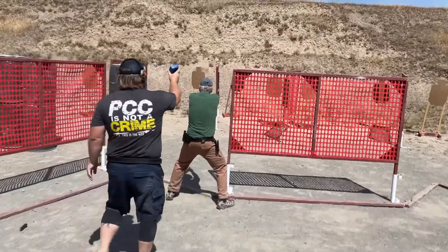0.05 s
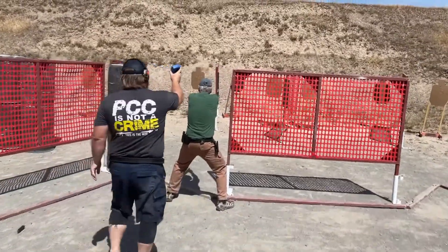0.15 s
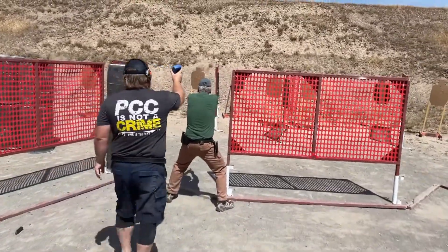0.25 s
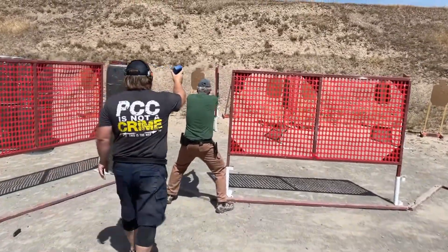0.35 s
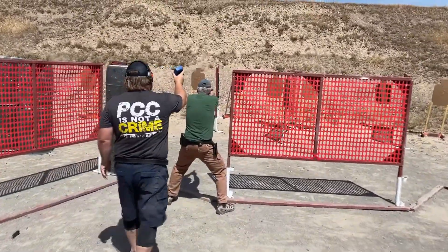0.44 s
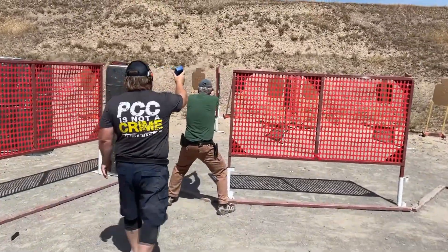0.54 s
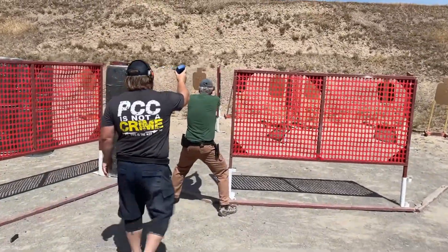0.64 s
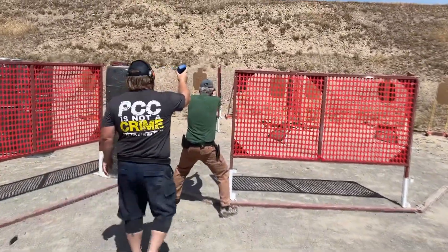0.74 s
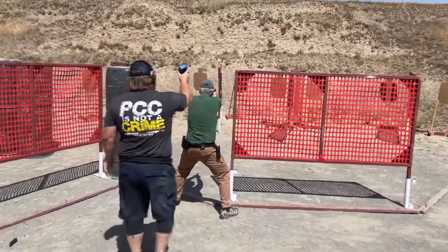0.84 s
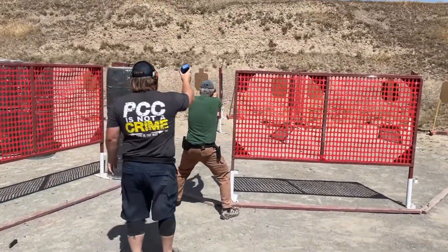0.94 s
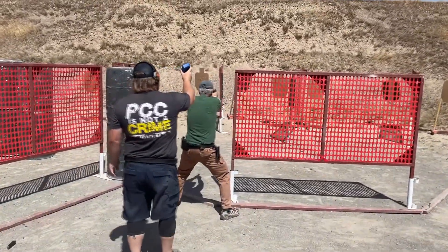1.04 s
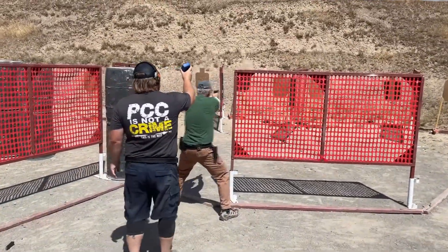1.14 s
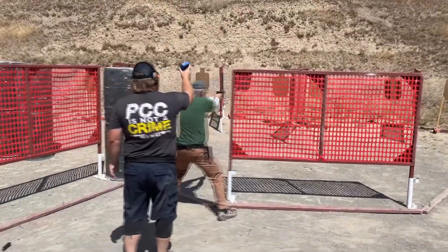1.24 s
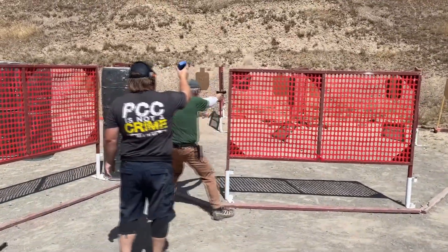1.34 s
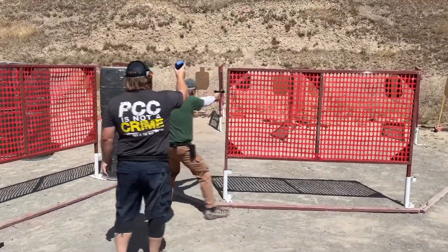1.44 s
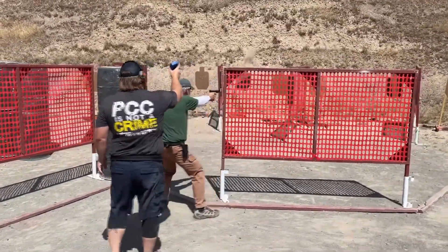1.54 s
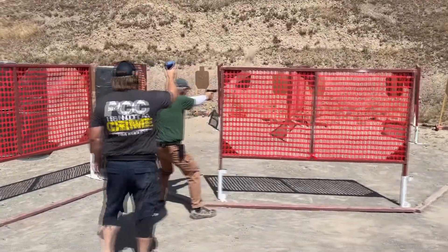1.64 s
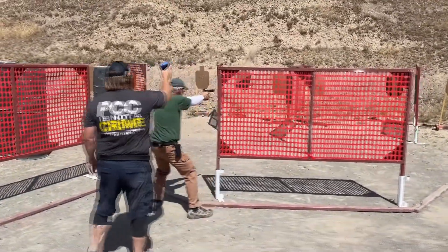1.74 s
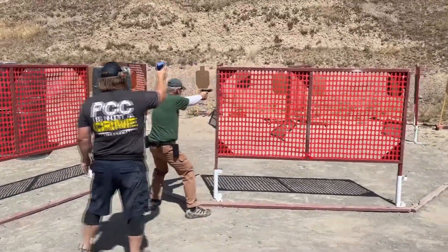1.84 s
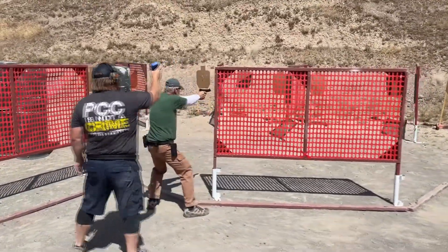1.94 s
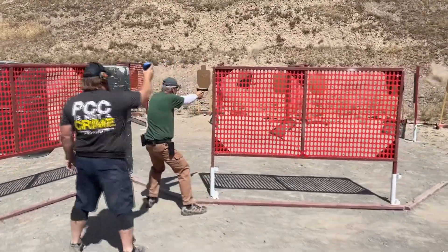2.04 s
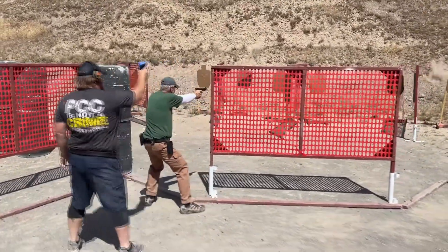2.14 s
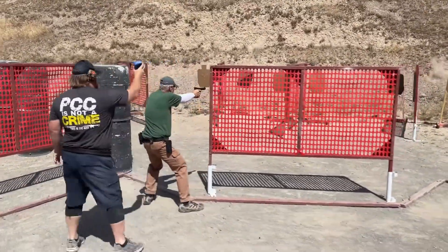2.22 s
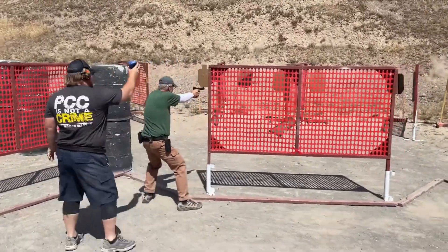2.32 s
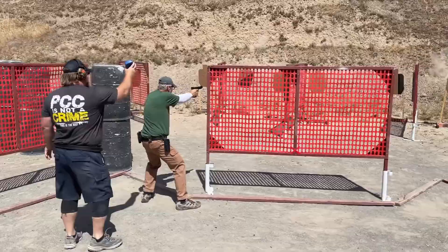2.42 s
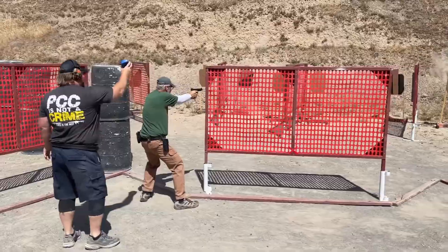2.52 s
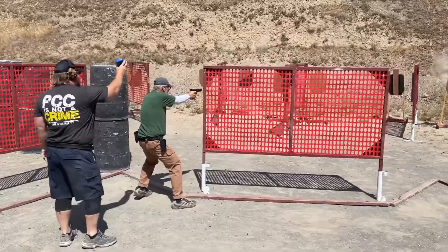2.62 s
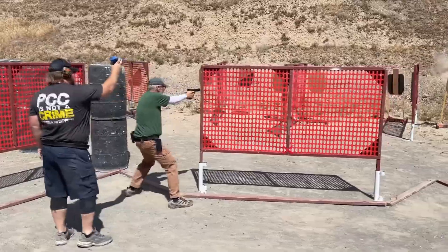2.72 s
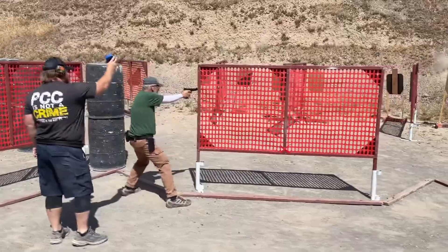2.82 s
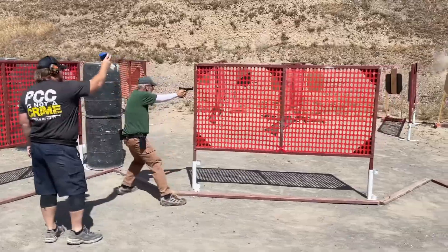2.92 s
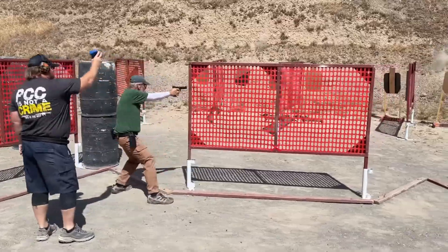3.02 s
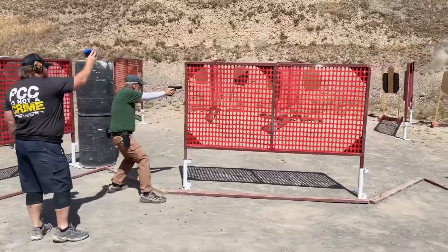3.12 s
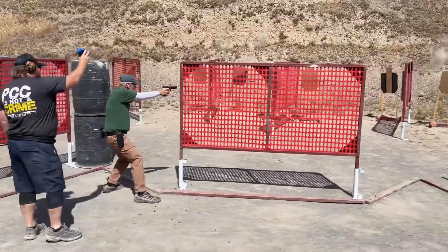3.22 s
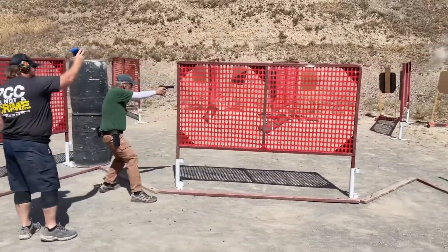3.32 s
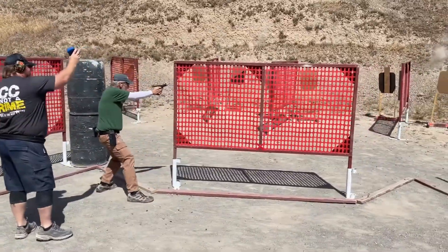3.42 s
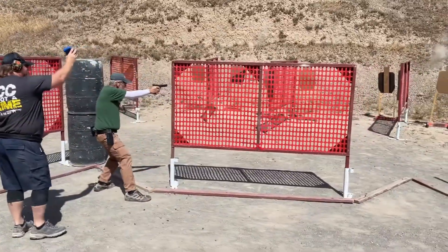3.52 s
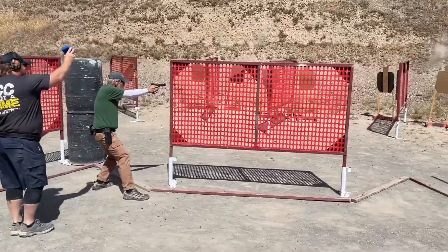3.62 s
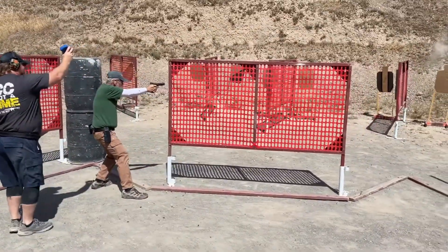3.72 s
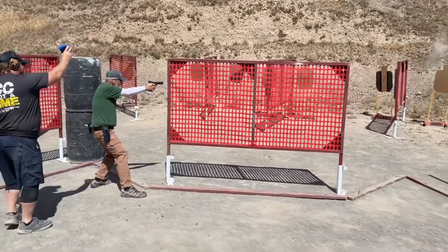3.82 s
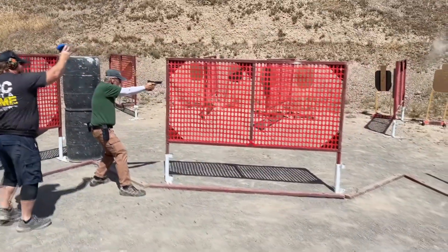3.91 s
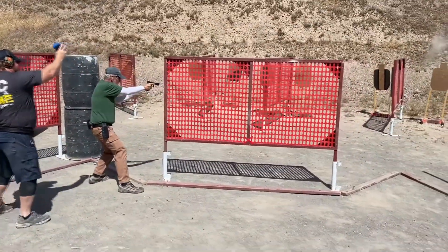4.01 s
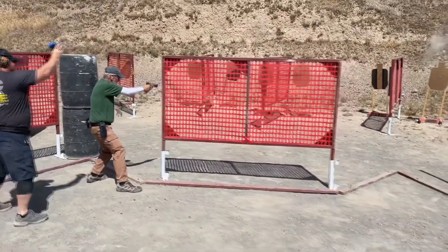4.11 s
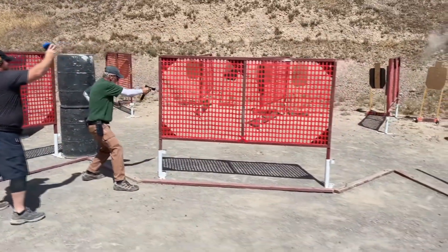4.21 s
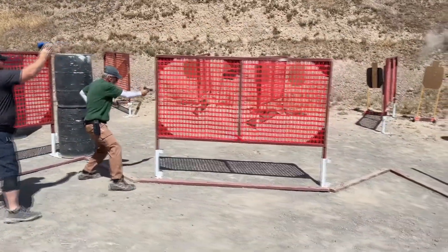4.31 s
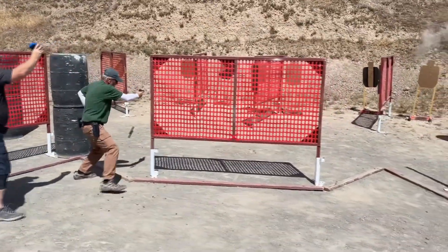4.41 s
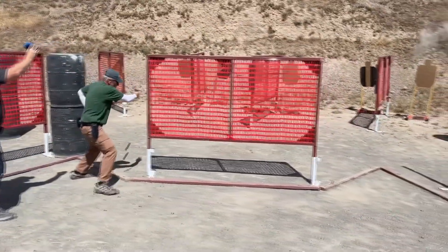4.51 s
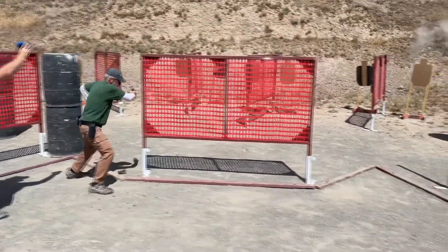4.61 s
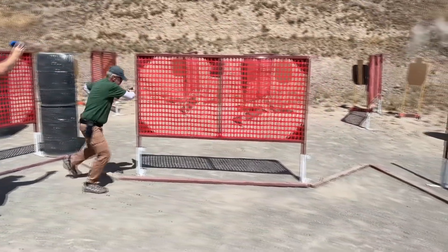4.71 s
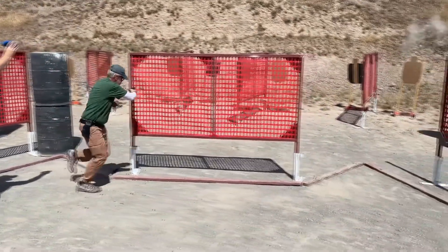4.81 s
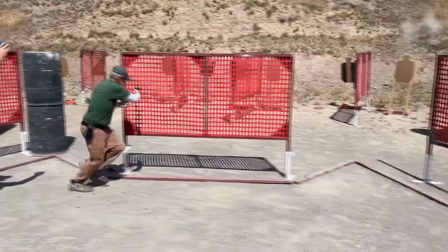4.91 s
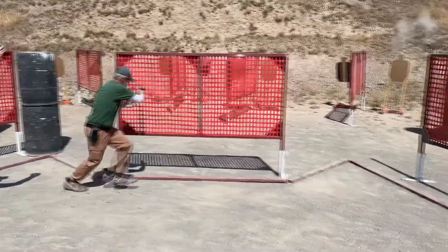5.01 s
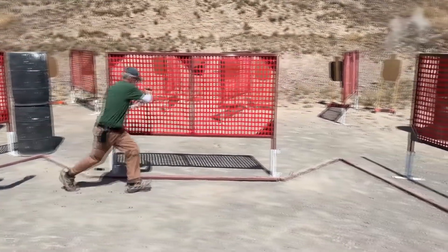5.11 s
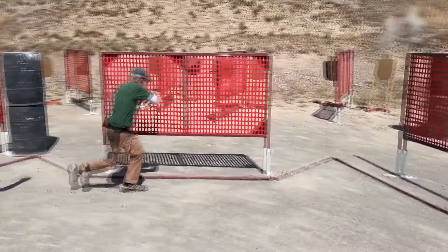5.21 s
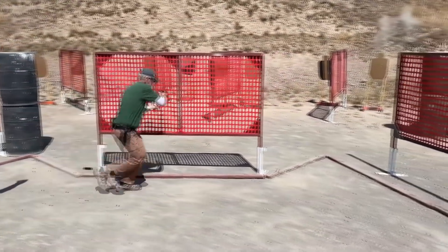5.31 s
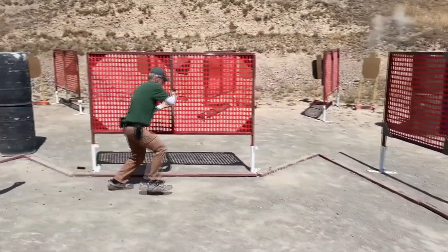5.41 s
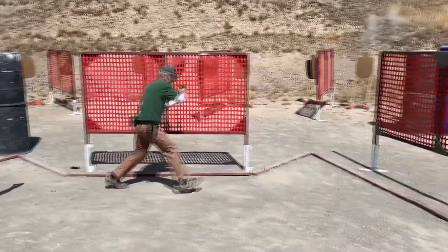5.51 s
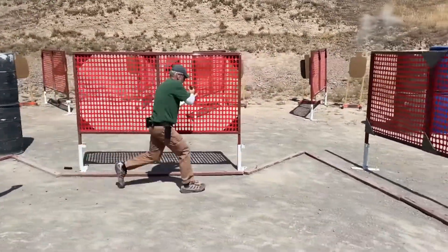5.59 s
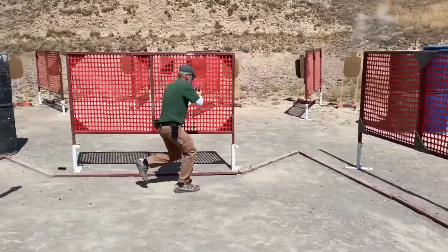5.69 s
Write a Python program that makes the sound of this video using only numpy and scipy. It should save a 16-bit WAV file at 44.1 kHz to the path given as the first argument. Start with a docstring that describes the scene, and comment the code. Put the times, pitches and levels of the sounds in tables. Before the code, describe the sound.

Outdoors in a gravel shooting bay, a nearby pistol fires hard, dry cracks in quick pairs, each with slapping echoes off barricades and dirt slopes and a short rolling tail. Duller pops from another pistol slip in early. After the last pair, shoes scuff quickly over gravel and the far pops return. Low wind rumbles on the stereo microphone a few metres behind.

```python
"""A pistol fires in quick pairs, a few metres ahead, in a gravel shooting bay walled by earth berms.
Each shot is a filtered pressure pulse and damped thumps, with its ground bounce; then come noise for the
bullet's slap, thin delayed copies off barricades, sprays of small echoes off the berms and a long hill roll.
Pops with bright echoes, from another pistol in the next bay, begin between the first pairs and return at the end.
A dull knock, then shoes scuffing gravel, are decaying noise; wind rumbles and flutters as lumpy noise throughout."""
import sys
import numpy as np
from scipy import signal
from scipy.fft import rfft, irfft
from scipy.io import wavfile
from scipy.ndimage import uniform_filter1d, minimum_filter1d

SR = 44100
rng = np.random.default_rng(int(sys.argv[2]) if len(sys.argv) > 2 else 0)


def inscribe(sig):
    """Save sig as 16-bit PCM at rate SR to the path in sys.argv[1].

    A 1-D sig is mono; a 2-D sig holds one channel per row.
    Samples are clipped to [-1, 1] before scaling.
    """
    pcm = np.round(np.clip(np.atleast_2d(sig).T, -1, 1) * 32767)
    wavfile.write(sys.argv[1], SR, pcm.astype(np.int16))


N = 253575
# time axis of a single event, in seconds
T = np.arange(2 ** 16) / SR

# Spectrum of an echo off rough earth. Each row: frequency in Hz, relative level in dB.
BERM_SPECTRUM = [(50, -9.5), (200, -8.5), (450, 1), (750, 2.5), (1200, -10.5), (2400, -2.5), (4000, -14),
                 (5500, -12.5), (7500, -22), (10000, -23.5), (16000, -44)]
# Spectrum of grinding stones. Each row: frequency in Hz, relative level in dB.
GRAVEL_SPECTRUM = [(150, 8), (500, 2.5), (1500, 4.5), (3000, 1), (6000, -0.5), (10000, -3), (16000, -12)]


def near_pistol():
    """Impulse and reflections: direct blast and ground image, then early echoes, then diffuse returns."""
    # Shots in the bay. Each row: start in seconds, blast level in dB, gain of the bark band in dB,
    # ground bounce delay in ms, side screen echo in dB relative to the blast, thump level in dB,
    # bullet flight time in ms, bullet slap level in dB.
    shots = [(-0.1155, 1, -1.5, 2, -10, -15, 17, -24), (0.1973, -0.5, -4.5, 2.62, -2.5, -8.5, 22, -25.5),
             (0.6721, 6, -4, 2.7, -7.5, -23, 17.2, -10.5), (0.9872, 1, -5.5, 2.7, -8, -27.5, 22, -17.5),
             (1.9019, 1, 4.5, 2.42, -27, -22, 13.3, -22), (2.4239, 4.5, 3, 2.6, -25, -14, 19, -19.5),
             (3.4408, -1.5, 1.5, 2.5, -17.5, -10, 10.8, -21),
             (3.8043, 6.5, 0, 2.5, -21, -16.5, 13.6, -22.5)]
    # Spectra. Each row: frequency in Hz, relative level in dB.
    blast_spectrum = [(40, -22.5), (150, -5.5), (260, 5.5), (400, 3), (600, -0.5), (900, -1), (1250, -3),
                      (1900, -4), (2800, -13.5), (4000, -24), (9000, -23.5), (16000, -42.5)]
    face_spectrum = [(60, -21.5), (300, -10.5), (750, 5), (1200, -3), (2200, 1), (3200, -0.5), (4500, -16),
                     (16000, -33)]
    slap_spectrum = [(200, -17.5), (1000, -7), (2500, -2), (5000, -6.5), (9000, -9), (16000, -22.5)]
    clutter_spectrum = [(60, -1.5), (200, 2.5), (400, 0), (900, 5.5), (2000, -1), (3600, -8.5), (5000, -2),
                        (7500, -18.5), (10000, -13.5), (13000, -28), (16000, -28.5)]
    roll_spectrum = [(60, -2), (250, -3.5), (550, 0), (1000, -4), (1700, -4), (3000, -8.5), (4000, -16.5),
                     (5500, -13.5), (9000, -26.5), (16000, -49)]
    hill_spectrum = [(200, -21), (900, -10), (1500, 0), (2200, -6), (3500, -12), (16000, -48.5)]

    out = np.zeros((2, N))
    muzzle = pulse(blast_spectrum)
    face_copy = pulse(face_spectrum)
    # the bark: a band of the blast that is stronger or weaker with the direction of the muzzle
    bark = signal.lfilter(*signal.iirpeak(1850, 3.4, fs=SR), muzzle)
    screen_ms = 5.0
    mean_screen_db = np.mean(shots, axis=0)[4]

    for start, blast_db, bark_db, bounce_ms, screen_db, thump_db, flight_ms, slap_db in shots:
        blast = muzzle + (from_db(bark_db) - 1) * bark
        # the hard ground returns the blast almost undiminished; a screen beside the shooter adds a third beat
        direct = arrive(blast, 0, right_lag_ms=0.0037)
        direct += from_db(-1.16) * arrive(blast, bounce_ms, right_lag_ms=0.0049)
        direct += from_db(screen_db) * arrive(blast, screen_ms, right_lag_ms=0.052)

        # the crack sizzles on for a moment, and longer when the screen's mesh scatters it back
        sizzle = from_db(-20.5) * swell(0, rise=0.001, t60=0.065)
        sizzle += from_db(screen_db - 10.5) * swell(screen_ms / 1000, rise=0.0015, t60=0.026)
        crack = arrive(noise(slap_spectrum)[0] * sizzle, 0, right_lag_ms=0.018)

        thump = muzzle_thump(thump_db)
        slap = noise(slap_spectrum) * swell(flight_ms / 1000, rise=0.00048, t60=0.016)
        clutter = reflections(clutter_spectrum, swell(0, rise=0.0032, t60=0.18), per_s=1800,
                              spread_db=3.5, ear_lag_ms=0.07)

        # rough earth slopes return a spray of small echoes, flat faces a thinner copy of the blast
        slopes = swell(0.028, rise=0.006, t60=0.145)
        slopes += from_db(-12) * swell(0.0836, rise=0.0047, t60=0.051)
        berms = reflections(BERM_SPECTRUM, slopes, per_s=2200, spread_db=3.0)
        faces = flat_face_echoes(face_copy)

        # the hill rolls on for most of a second, with a nasal return from a far slope
        roll = reflections(roll_spectrum, swell(0.033, rise=0.055, t60=0.91), per_s=6700, spread_db=4.0)
        far_slope = from_db(-0.5) * swell(0.162, rise=0.0028, t60=0.076)
        far_slope += from_db(-7) * swell(0.24, rise=0.022, t60=0.27)
        roll += reflections(hill_spectrum, far_slope, per_s=740, spread_db=2.0)
        # the far ridge answers last
        crests = swell(0.38, rise=0.06, t60=0.25) + from_db(-1) * swell(0.51, rise=0.03, t60=0.9)
        ridge = reflections(roll_spectrum, crests, per_s=900, spread_db=3.5)

        # clutter and berms gain 0.11 dB for each dB that the screen echo stands above its mean
        spill_db = 0.11 * (screen_db - mean_screen_db)
        spray = from_db(blast_db) * crack
        spray += from_db(-17 + spill_db) * clutter + from_db(-23 + spill_db) * berms
        spray += from_db(-52) * roll + from_db(-64.5) * ridge

        shot = from_db(blast_db) * direct + thump + from_db(slap_db) * slap
        shot += from_db(-23) * faces + bounced(spray, bounce_ms, share=0.15)
        add(out, start, shot)
    return out


def muzzle_thump(thump_db):
    """Damped oscillation: the muzzle gas gives a thump and a short puff; a faint deep boom follows."""
    thump = from_db(thump_db) * ring(hz=80, delay=0.011, rise=0.0015, t60=0.039)
    puff = from_db(-14.5) * ring(hz=201, delay=0.005, rise=0.001, t60=0.026)
    boom = from_db(-43.5) * ring(hz=47, delay=0.08, rise=0.056, t60=0.34)
    return arrive(thump + puff + boom, 0, right_lag_ms=0.15)


def flat_face_echoes(face_copy):
    """Specular reflection: distinct, thinner copies of the blast, with little bass, each with a treble cutoff."""
    # Echoes off barricades and berm faces. Each row: delay in ms, level in dB relative to the flat faces'
    # common level, low-pass cutoff in Hz, lag of the right side in ms.
    echoes = [(23.5, 2, 4000, .1), (31.8, 7, 5000, -.15), (38, 11, 6000, .06), (45, 13, 3600, -.13),
              (92, -6, 800, .1), (163.5, -19, 4000, .1)]
    out = np.zeros((2, len(T)))
    for delay_ms, level_db, cutoff_hz, right_lag_ms in echoes:
        gain = from_db(level_db + rng.normal(0, 0.7))
        out += gain * arrive(low_pass(face_copy, cutoff_hz), delay_ms, right_lag_ms)
    return out


def far_pistol():
    """Barrier shading: the side berm dulls the direct pop, while barricade and back slope echoes keep treble."""
    # Shots in the next bay. Each row: start in seconds, pop level in dB, barricade echo level in dB,
    # back slope delay in seconds.
    far_shots = [(0.417, -31, -51, 0.069), (1.1327, -32, -46.5, 0.073), (1.3367, -31.5, -48, 0.085),
                 (4.3616, -25.5, -49.5, 0.055), (4.736, -26.5, -66, 0.056), (5.6745, -26.5, -55.5, 0.054)]
    # Spectra of pop and echoes. Each row: frequency in Hz, relative level in dB.
    pop_spectrum = [(50, -31.5), (130, -11.5), (280, -10), (430, 7), (600, -4.5), (1200, -9), (1800, -16.5),
                    (2900, -13.5), (4500, -38), (8000, -45), (16000, -50.5)]
    echo_spectrum = [(150, -3.5), (500, -6), (1000, 2), (1800, -2), (3000, 3.5), (5000, -4), (8000, -9.5),
                     (11000, -18.5), (16000, -32.5)]

    out = np.zeros((2, N))
    # the direct pop is slightly earlier and stronger at right
    pop = arrive(pulse(pop_spectrum), 0.27, right_lag_ms=-0.27) * from_db([[-0.3], [0.3]])
    for start, pop_db, barricade_db, slope_s in far_shots:
        scatter = reflections(BERM_SPECTRUM, swell(0, rise=0.0054, t60=0.37), per_s=1300, spread_db=4.0)
        scatter = low_pass(scatter, hz=6000)
        barricade = reflections(echo_spectrum, swell(0.0555, rise=0.0027, t60=0.084),
                                per_s=3200, spread_db=6.5)
        slope = swell(slope_s, rise=0.018, t60=0.19) + from_db(-15) * swell(0.005, rise=0.082, t60=0.36)
        slope_echo = reflections(echo_spectrum, slope, per_s=5700, spread_db=3.5)
        spray = bounced(from_db(-18.5) * scatter + from_db(-20.5) * slope_echo, ms=2.4, share=0.17)
        shot = from_db(pop_db) * (pop + spray * from_db([[-1.1], [1.1]]))
        add(out, start, shot + from_db(barricade_db) * barricade)
    return out


def footsteps():
    """Granular friction: steps and chance shuffles on gravel, the quick ones brighter, and a dull knock."""
    # Each row: start in seconds, level in dB, length scale in seconds.
    steps = [(2.827, -67, 0.12), (2.928, -65.5, 0.18), (3.02, -66.5, .28), (4.627, -60.5, 0.04),
             (4.652, -63.5, 0.066), (5.015, -66.5, 0.12), (5.13, -64, 0.13), (5.28, -72.5, .14),
             (5.41, -73.5, 0.17), (5.565, -68.5, 0.12), (5.6, -58.5, 0.043)]
    out = np.zeros((2, N))
    shuffles_per_s, shuffle_db, mean_shuffle_s = 1.4, -78, 0.24
    chance = rng.random((round(shuffles_per_s * N / SR), 2))
    shuffles = [(when * N / SR, shuffle_db, mean_shuffle_s * (0.5 + slow)) for when, slow in chance]
    for start, level_db, length_s in list(steps) + shuffles:
        # cutoff is inversely proportional to length: 6200 Hz at 0.074 s
        add(out, start, crunch(level_db, length_s, hz=6200 * 0.074 / length_s))
    knock = low_pass(noise(GRAVEL_SPECTRUM), hz=1303) * swell(0, rise=0.001, t60=0.035)
    add(out, 2.1, from_db(-52.5) * knock)
    return out


def crunch(db, length, hz, grain_db=4.5, grains_per_s=400):
    """Granular noise: a sole grinds many small stones, each tick with its own strength."""
    strengths = from_db(grain_db * rng.standard_normal(len(T)))
    grains = strengths[(T * grains_per_s).astype(int) % len(T)]
    grinding = low_pass(noise(GRAVEL_SPECTRUM) * grains / grains.std(), hz)
    return from_db(db) * grinding * swell(0, rise=length / 5, t60=2 * length)


def wind(rumble_lump_db=3.5, flutter_lump_db=6.0, lumps_per_s=22):
    """Modulated noise: lumpy buffeting and a flutter that grows fast in gusts, over the hush of open air."""
    # Strength of the wind on the microphone. Each row: time in seconds, level in dB.
    gusts = [(0.0, -60), (0.06, -62), (0.16, -50), (0.54, -61.5), (1.12, -51), (1.44, -54.5), (1.54, -44),
             (1.78, -59), (3.52, -55), (3.76, -54.5), (4.12, -49), (4.34, -65.5), (4.44, -54.5),
             (4.62, -69), (4.76, -47.5), (4.92, -71.5), (5.0, -57.5), (5.52, -55), (5.56, -60.5),
             (5.74, -60.5)]
    # Spectra. Each row: frequency in Hz, relative level in dB.
    rumble_spectrum = [(20, -23), (45, 0), (70, 0), (110, -2), (160, -15), (400, -55)]
    flutter_spectrum = [(70, -23), (130, 1), (200, -2), (280, -8.5), (400, -22.5), (1000, -45.5),
                        (4000, -70.5)]
    air_spectrum = [(50, 1), (300, -4.5), (800, 2), (2000, -1), (3200, -5.5), (6000, -19), (10000, -36),
                    (16000, -50)]

    now = np.arange(N) / SR
    wind_db = np.interp(now, *np.transpose(gusts))
    rumble_db = wind_db - 2
    # the flutter grows 1.5 dB for each dB of gust
    flutter_db = -70.5 + 1.5 * (wind_db - wind_db.mean())
    out = from_db(-75.5) * noise(air_spectrum, size=N)
    layers = ((rumble_spectrum, rumble_db, rumble_lump_db),
              (flutter_spectrum, flutter_db, flutter_lump_db))
    for spectrum, level_db, lump_db in layers:
        lumps = np.interp(now * lumps_per_s, np.arange(N), rng.standard_normal(N))
        out += from_db(level_db + lump_db * lumps) * noise(spectrum, size=N)
    return out


def reflections(spectrum, envelope, per_s, spread_db, ear_lag_ms=0.14):
    """Diffuse reflection: many small pulses of random delay, strength, sign and direction under an envelope."""
    hits = rng.random(len(T)) < per_s / SR
    sizes = hits * rng.choice([-1, 1], len(T))
    sizes = sizes * from_db(spread_db * np.clip(rng.standard_normal(len(T)), -2, 2))
    # each echo reaches the right side with its own small lag or lead
    right_times = T + ear_lag_ms / 1000 * rng.standard_normal(len(T))
    at_right = np.round(right_times * SR).astype(int)
    right = np.bincount(at_right % len(T), sizes, len(T))
    shape = pulse(spectrum)
    impulses = np.array([sizes, right]) * envelope
    sound = signal.fftconvolve(impulses, shape[None, :len(T) // 16])[:, :len(T)]
    # scaled so that the rms follows the envelope
    return sound / (sizes.std() * np.linalg.norm(shape))


def bounced(x, ms, share):
    """Comb filtering: a sound plus its weaker, later ground bounce, scaled to keep the power of noise."""
    late = np.array([np.interp(T - ms / 1000, T, side, left=0) for side in x])
    return (x + share * late) / np.hypot(1, share)


def pulse(spectrum):
    """Minimum phase and dispersion: a pulse of height 1, smeared by the microphone into a downward chirp."""
    # Bands that the microphone holds back. Each row: frequency in Hz, Q without unit.
    lagging_bands = [(430, 1.7), (900, 1.0), (1800, 2.5), (3500, 0.8)]
    bin_hz = np.maximum(np.fft.rfftfreq(len(T), 1 / SR), 1)
    # folding the cepstrum onto positive times gives the minimum phase
    cepstrum = irfft(np.log(from_db(at_hz(spectrum, bin_hz))))
    folded = 2 * cepstrum * (T > 0) * (T < T[-1] / 2)
    x = irfft(np.exp(rfft(folded)))
    for hz, q in lagging_bands:
        # reversed coefficients make an all-pass filter: delay without change of level
        _, a = signal.iirpeak(hz, q, fs=SR)
        x = signal.lfilter(a[::-1], a, x)
    return x / np.abs(x).max()


def noise(spectrum, size=len(T)):
    """Partial coherence: stereo noise of rms 1 whose left-right likeness depends on frequency."""
    # Each row: frequency in Hz, left-right correlation without unit.
    likeness = [(60, .99), (300, .94), (700, 0.83), (2000, 0.13), (5000, .3), (9000, 0.13), (16000, 0.95)]
    hz = np.maximum(np.fft.rfftfreq(size, 1 / SR), 1)
    alike = np.clip(at_hz(likeness, hz), -1, 1)
    mid, side = rfft(rng.standard_normal((2, size)))
    stereo = np.sqrt(1 + alike) * mid + np.sqrt(1 - alike) * side * [[1], [-1]]
    x = irfft(from_db(at_hz(spectrum, hz)) * stereo, size)
    return x / x.std()


def swell(delay, rise, t60):
    """Exponential decay: waits, climbs to 1, then falls 60 dB in every t60; all times in seconds."""
    age = T - delay
    return np.clip(age / rise, 0, 1) * from_db(-60 * np.maximum(age - rise, 0) / t60)


def ring(hz, delay, rise, t60):
    """Damped resonance: a sine under a swelling and dying envelope."""
    return np.sin(2 * np.pi * hz * (T - delay)) * swell(delay, rise, t60)


def arrive(x, ms, right_lag_ms):
    """Path difference: a delayed sound that reaches the right side a little earlier or later."""
    return np.array([np.interp(T - lag / 1000, T, x, left=0) for lag in (ms, ms + right_lag_ms)])


def low_pass(x, hz):
    """Treble loss: a gentle second-order low-pass filter."""
    # the tiny offset avoids denormal numbers
    return signal.sosfilt(signal.butter(2, min(hz, 0.45 * SR), fs=SR, output="sos"), x + 1e-18)


def from_db(db):
    """Logarithmic level: decibels to amplitude gain."""
    return 10 ** (np.asarray(db) / 20)


def at_hz(points, hz):
    """Logarithmic frequency: reads a table along a log-frequency axis."""
    table = np.array(points)
    return np.interp(np.log(hz), np.log(table[:, 0]), table[:, 1])


def add(out, s, sound):
    """Superposition: mixes a sound in from time s in seconds, dropping what falls outside the scene."""
    start = round(s * SR)
    first, last = max(start, 0), min(start + sound.shape[-1], N)
    out[:, first:last] += sound[..., first - start:last - start]


def scene():
    """Superposition: the pressures of both pistols, the footsteps and the wind add."""
    return near_pistol() + far_pistol() + footsteps() + wind()


def record(dry, width_db=10.5, width_hz=260, ceiling_db=-4.5, release_db_per_s=2200):
    """Filtering and limiting: the recorder widens the bass, cuts the lowest rumble, limits peaks, cuts the top."""
    side = signal.lfilter(*signal.butter(1, width_hz, fs=SR), (dry[0] - dry[1]) / 2)
    wide = dry + from_db(width_db) * side * [[1], [-1]]
    x = signal.sosfilt(signal.butter(2, 39, "high", fs=SR, output="sos"), wide)
    # the limiter ducks within a few samples of a peak and recovers at a steady rate in dB
    over_db = np.maximum(20 * np.log10(np.abs(x).max(axis=0) + 1e-9) - ceiling_db, 0)
    recovery = release_db_per_s * np.arange(N) / SR
    gain_db = minimum_filter1d(recovery - np.maximum.accumulate(over_db + recovery), size=15)
    x = x * from_db(uniform_filter1d(gain_db, size=15))
    return signal.sosfilt(signal.ellip(10, 0.1, 80, 16200, fs=SR, output="sos"), x)


dry = scene()
out = record(dry)
inscribe(out)
```